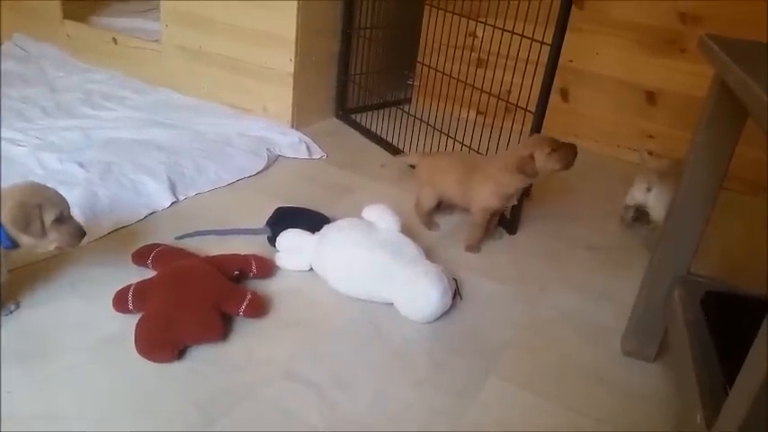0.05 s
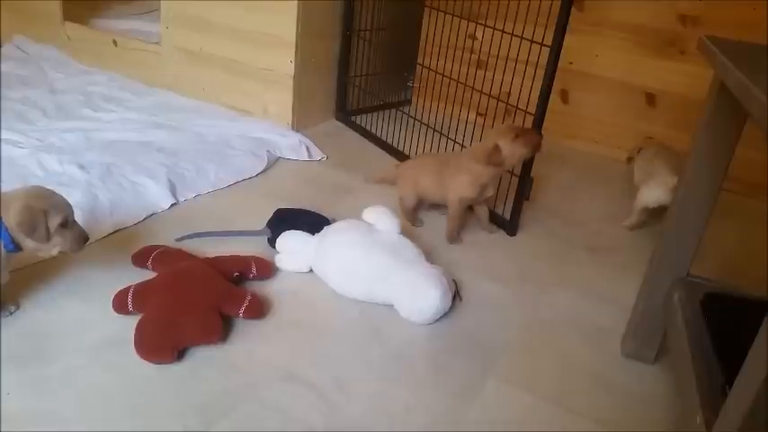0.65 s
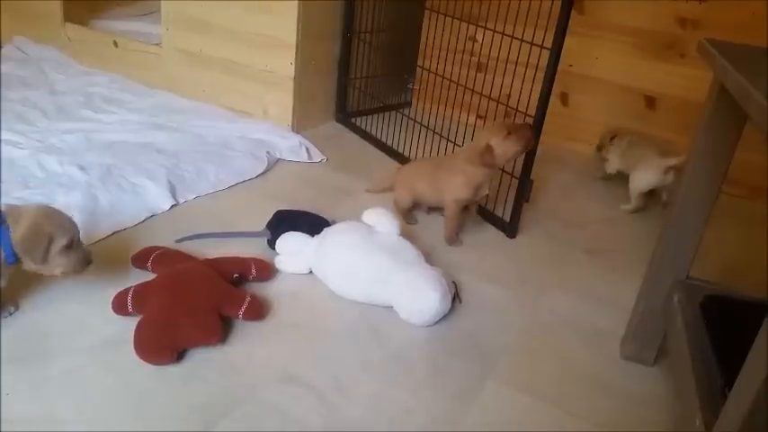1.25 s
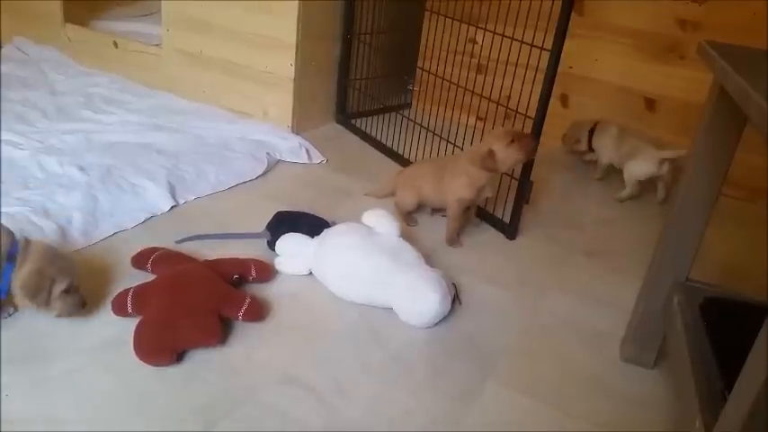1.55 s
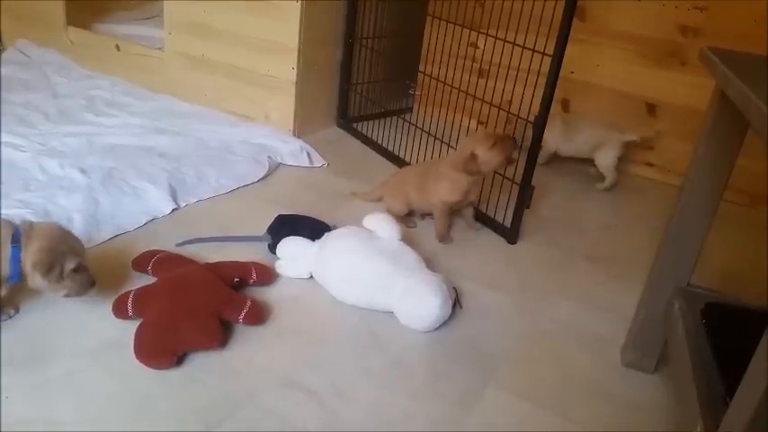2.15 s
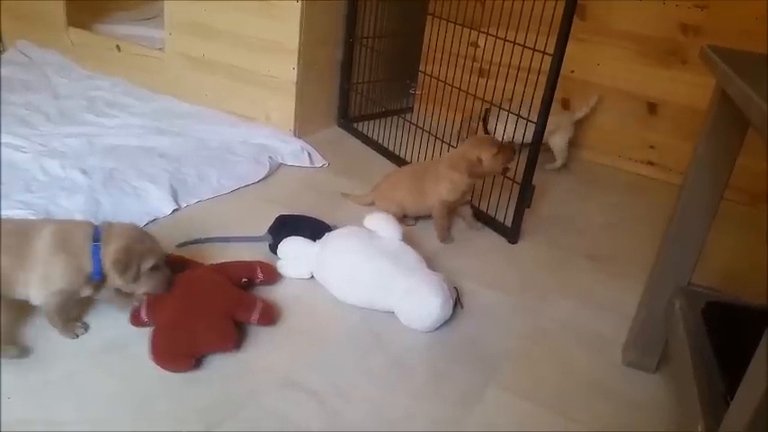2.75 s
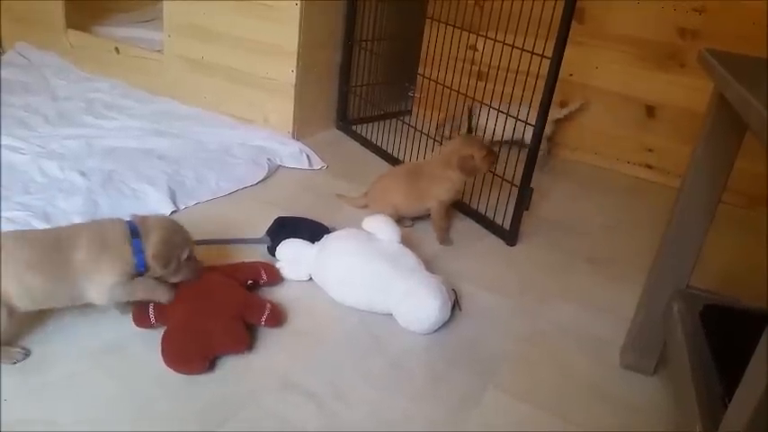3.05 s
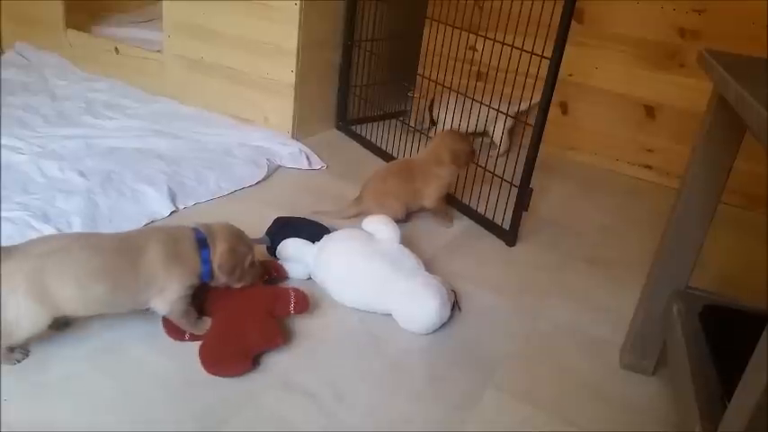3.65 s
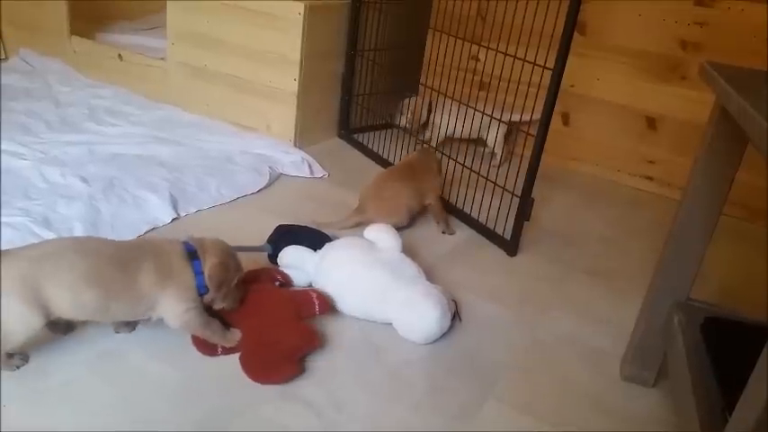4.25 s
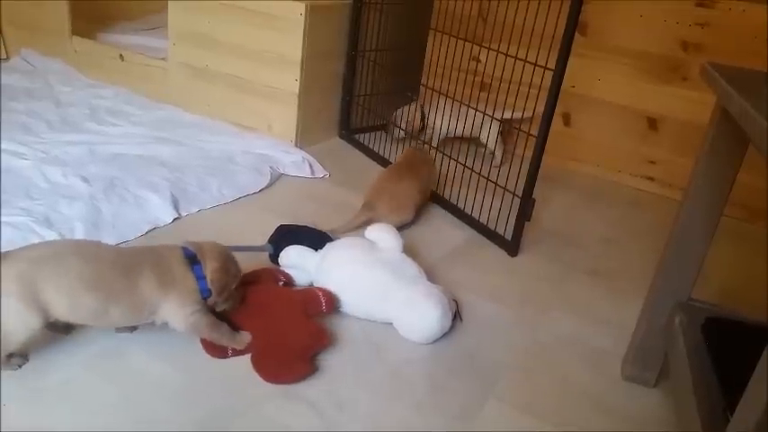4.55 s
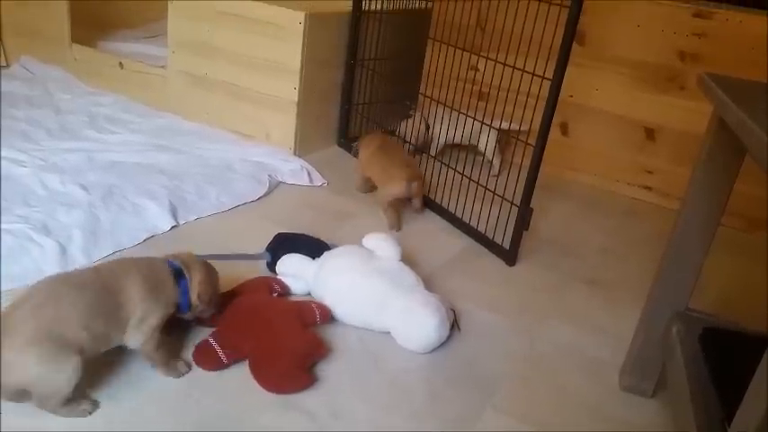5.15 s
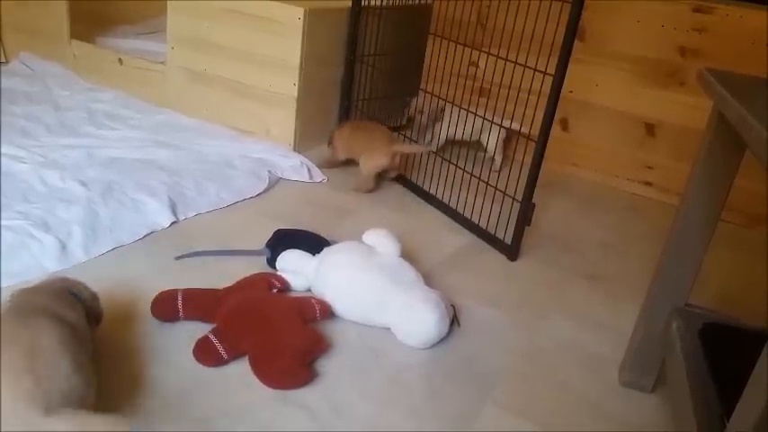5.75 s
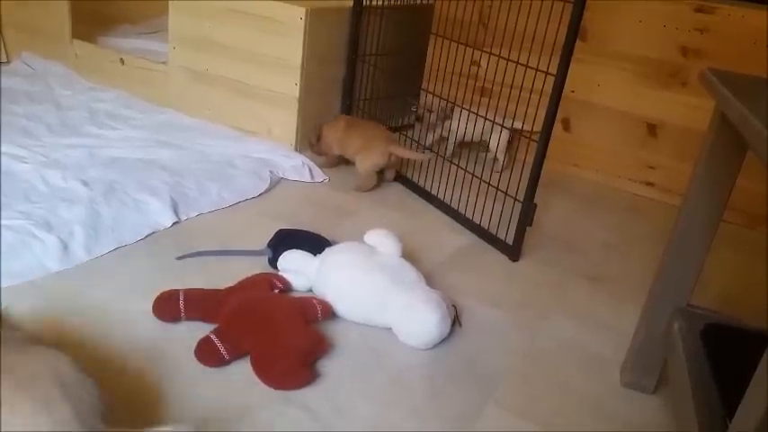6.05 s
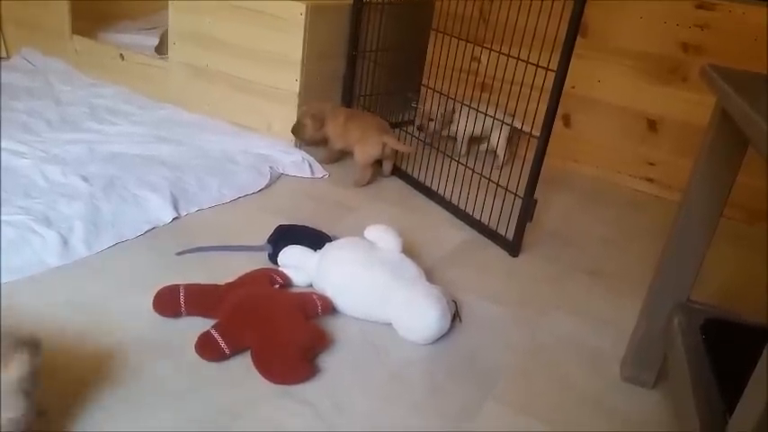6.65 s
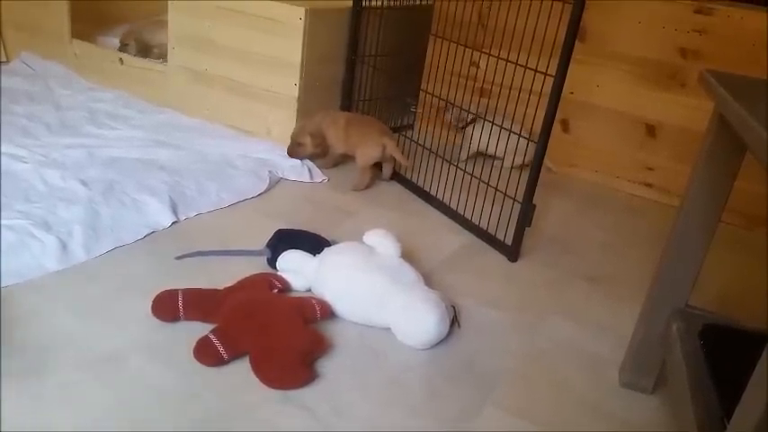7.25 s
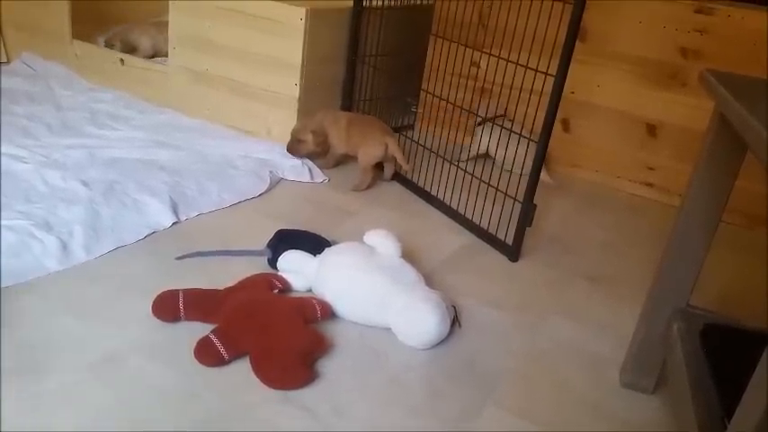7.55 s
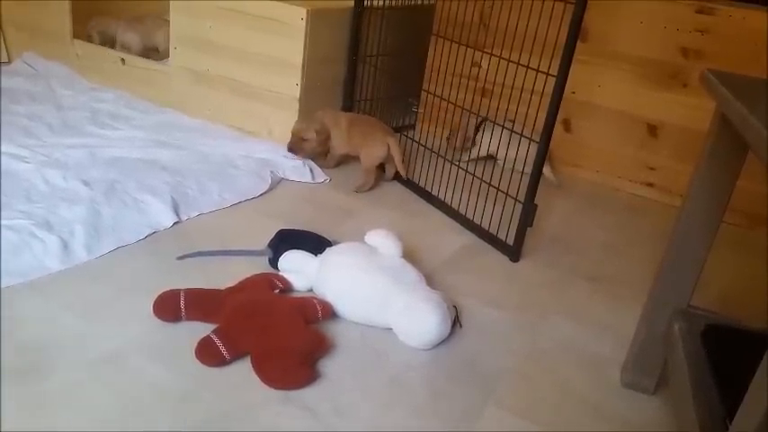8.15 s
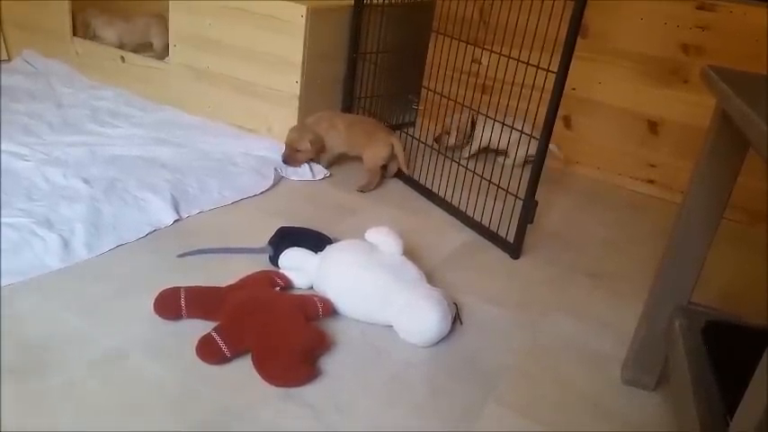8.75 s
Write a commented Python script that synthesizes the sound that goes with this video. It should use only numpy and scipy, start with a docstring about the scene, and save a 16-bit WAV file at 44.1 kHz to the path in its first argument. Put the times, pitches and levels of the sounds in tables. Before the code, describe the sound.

Young puppies whine and cry in short, high, falling calls in a small room, with soft paw steps and scuffs.

```python
"""Puppies whimpering at a wire gate, a little right of a stereo microphone in a small wood-panelled room.
Their vocal folds make every call: one whines in high, almost pure arches that drop away at the end;
a second cries with a brighter voice, hoarse when the folds beat unevenly; softer whimpers and grunts
fall in between. The microphone stands far enough off for the room to smear every glide.
Paws pad and scuff on the floor over a faint hum and hiss."""
import sys
import numpy as np
from scipy import signal
from scipy.fft import rfft, irfft
from scipy.io import wavfile
from scipy.ndimage import uniform_filter1d, minimum_filter1d

SR = 44100
rng = np.random.default_rng(int(sys.argv[2]) if len(sys.argv) > 2 else 0)


def persist_wave(psi):
    """Save psi, clipped to +-1, as 16-bit WAV."""
    counts = np.round(np.clip(psi, -1, 1) * 32767).astype(np.int16)
    wavfile.write(sys.argv[1], SR, np.atleast_2d(counts).T)


N = 397341
TIME = np.arange(N) / SR

# Levels in the tables are relative: each source adds its own gain.
# Spectra of room air, high hiss and rubbing paws. Each row: frequency in Hz, level in dB.
AIR_COLOUR = [(15, -29), (25, 2.5), (43, -5.5), (219, 0), (610, -17), (1150, -11), (2070, -13.5),
              (3280, -27.5), (6500, -36), (8500, -65), (11000, -94), (18700, -120)]
HISS_COLOUR = [(8300, -31), (9400, -8.5), (10200, 3), (12000, 4.5), (13500, 1.5), (15000, 1)]
SCUFF_COLOUR = [(300, -14.5), (800, 7), (1500, 5), (2200, 11.5), (3300, -8.5), (5000, -6.5), (6500, -17),
                (8000, -28), (11000, -11), (15000, -14)]
# Spectrum of bodies moving about. Each row: frequency in Hz, level in dB.
SHUFFLE_COLOUR = [(60, -24.5), (130, -7.5), (220, -1.5), (330, -10), (550, -9.5), (1500, -9),
                  (3000, -23), (8000, -44.5)]
# Slow swells of the hum and the hiss. Each row: time in seconds, level in dB.
HUM_LEVELS = [(0, -61), (1.5, -60.5), (5.3, -54.5), (5.9, -64), (9, -65.5)]
HISS_LEVELS = [(0.0, -56), (2.91, -59.5), (3.71, -56), (4.84, -56), (6.1, -65.5), (6.57, -59.5),
               (6.97, -66), (7.5, -56), (8.73, -65), (9.01, -55)]
# The first puppy's whines. Each row: start, length and rise in seconds; onset, crest, shoulder and
# end pitch in Hz; level, onset and end offsets, second harmonic and higher harmonics in dB.
WHINES = [ (0.067, 0.13, 0.052, 1399, 1562, 1520, 832, -17, -7, 1, -30.5, -38.5),
          (0.340, 0.22, 0.047, 1297, 1548, 1372, 831, -16.5, 1, 2, -34.5, -41),
          (0.678, .240, 0.066, 1210, 1452, 1369, 851, -15, -7, 0.5, -33.5, -39.5),
          (1.060, .467, 0.066, 1131, 1438, 1388, 834, -14.5, 1, -1.5, -32, -39),
          (1.673, 0.44, 0.11, 1161, 1430, 1426, 792, -16, 1.5, -0.5, -27.5, -34),
          (3.589, 0.12, 0.049, 1674, 1835, 1680, 1203, -14, -11.5, -14, -20, -34.5),
          (3.856, 0.22, 0.054, 1393, 1755, 1621, 1312, -18, -2.5, -5, -26.5, -34),
          (4.218, 0.086, 0.057, 1395, 1640, 1630, 1593, -15.5, -3.5, -18.5, -38.5, -34.5),
          (4.314, 0.075, 0.031, 1561, 1578, 1589, 1586, -27, -5.5, 3.5, -23, -24),
          (4.387, 0.16, 0.043, 1583, 1614, 1616, 1619, -15.5, -5.5, -9.5, -27.5, -34.5),
          (7.097, 0.046, 0.014, 1553, 1530, 1472, 1420, -30, -4, -16.5, -30, -35.5),
          (7.468, 0.1, 0.0257, 1713, 1822, 1752, 1228, -14, 1, -7, -30, -42),
          (7.759, 0.19, 0.14, 1606, 1894, 1862, 1385, -12, -11.5, -7, -22.5, -39),
          (8.143, 0.12, 0.058, 1684, 1871, 1813, 1174, -19, -7, -5, -20, -35),
          (8.878, 0.12, 0.075, 1545, 1668, 1638, 1016, -14.5, -13.5, -8.5, -35.5, -38), ]
# Soft whimpers and grunts. Each row: start and length in seconds, start and end pitch in Hz,
# level and second harmonic in dB, roughness from 0 to 1.
WHIMPERS = [ (0.110, 0.068, 903, 785, -31.5, -24, 0.2), (0.315, 0.065, 929, 755, -34.5, -16.5, 0),
            (1.781, 0.081, 1134, 839, -39.5, -1.5, 0.03), (2.014, 0.047, 1050, 736, -37, -11, 0.08),
            (2.168, 0.11, 1032, 923, -36, -11.5, .15), (2.468, 0.033, 377, 350, -49, -7, 0.08),
            (2.645, 0.019, 691, 769, -37.5, -24, 0.03), (2.839, 0.031, 596, 520, -40, -14, 0.5),
            (3.043, 0.067, 1321, 1278, -32.5, -37, 0.05), (3.232, 0.14, 637, 515.5, -36.5, -8.5, 0.33),
            (3.560, 0.064, 579.6, 588.5, -35.5, -12, 0.61), (3.732, 0.095, 987, 968, -42.5, -30, 0.04),
            (3.829, 0.071, 295.3, 340.4, -35.5, -10.5, 0), (4.216, 0.035, 690, 567, -41.5, -16, 0.2),
            (4.504, .05, 728, 560, -36.5, -6.5, 0.54), (4.797, 0.16, 306.4, 160.4, -44.5, -12.5, 0.16),
            (5.076, 0.042, 286, 275, -45.5, -18, 0), (5.092, 0.055, 962, 889, -38, -22.5, 0.09),
            (5.315, 0.064, 443.3, 428.3, -45, -0.5, 0.05), (5.522, 0.03, 708, 744, -41.5, -20, 0.04),
            (6.577, 0.046, 1013, 646, -48.5, -16.5, 0.44), (7.438, .045, 1893, 1703, -36, -26.5, 0.08),
            (8.25, 0.024, 703, 534, -41, -4, 0.08), (8.489, 0.022, 687, 530, -42, -3, 0),
            (8.738, 0.051, 874, 775, -36, -19.5, 0), (8.851, 0.064, 970, 871, -45, -15, 0), ]
# The second puppy's long, two-crested cry. Each row: time in seconds, pitch in Hz.
LONG_CRY_PITCH = [(2.272, 1102), (2.344, 1287), (2.422, 1221), (2.582, 1405), (2.688, 1390), (2.77, 1278),
                  (2.808, 1107), (2.82, 1100), (2.854, 949), (2.865, 930)]
# Short cries, and two soft falling whimpers with weak overtones.
# Each row: the columns of WHINES, then roughness from 0 to 1.
SHORT_CALLS = [ (3.026, .095, 0.035, 1130, 1155, 1155, 1148, -25, 1.5, -5.5, -6, -18, 0.07),
               (3.125, .110, .02, 1140, 1099, 1030, 885, -35, -1.5, -0.5, -6, -19, 0.2),
               (3.240, .095, 0.021, 907, 914, 894, 864, -35.5, -3, 1, -5.5, -25.5, 0.33),
               (3.339, .100, 0.021, 765, 746.4, 686, 606, -34, 2.5, -4.5, -4, -18.5, 0.56),
               (4.138, 0.078, .02, 1236, 1222, 1176, 673, -34.5, 1, -2, -27, -32.5, 0.1),
               (4.420, .090, .02, 1264, 1242, 1199, 700, -36.5, -5, 1, -26, -35.5, .05),
               (4.689, 0.064, 0.031, 1065, 1147, 1116, 694, -34.5, 0, 5.5, -9.5, -25, 0),
               (4.768, 0.052, 0.033, 835, 898, 930.3, 900, -32.5, 7.5, -5.5, 1, -29, 0.65),
               (4.842, 0.1, 0.0555, 980, 1138, 1133, 1070, -28.5, -1.5, -12, -30, -25.5, 0.11),
               (8.476, 0.04, 0.024, 1254, 1413, 1400, 1105, -23, 3, 0.5, -41, -54, .02),
               (8.515, .085, 0.024, 1149, 1121, 1096, 925, -38.5, 13, -4, -14, -35, .06), ]
# Throats colour the higher harmonics, the mouth the second. Each row: frequency in Hz, gain in dB.
WHINE_THROAT = [(3000, -4.5), (4200, 5), (5300, 5.5), (7100, -5), (7900, -18), (9200, -6.5), (11500, -8),
                (15000, -13)]
WHIMPER_THROAT = [(1300, -3.5), (2200, -18.5), (3200, -38.5), (12000, -52.5)]
CRY_THROAT = [(2400, 6), (3050, -6), (3450, 2), (3850, 2.5), (5000, -6), (6200, -12.5), (7200, -28),
              (8200, -38), (10000, -27.5), (14000, -51)]
MOUTH = [(1600, 14), (2000, 15), (2450, 9), (2850, -1.5), (3250, -5), (3600, 8), (3850, 7.5)]
# The main paw falls. Each row: time in seconds, level in dB.
PAW_FALLS = [(0.951, -24.5), (1.563, -13), (1.58, -14), (2.175, -23), (2.277, -22.5), (3.311, -25.5),
             (4.171, -22), (4.345, -27.5), (4.517, -20), (4.57, -21.5), (5.08, -35), (5.714, -35),
             (5.924, -43), (6.031, -42.5), (6.252, -33.5), (7.516, -26.5), (7.773, -26.5)]
# Resonances of the floor. Each row: frequency in Hz, level in dB, time to fall 60 dB in seconds.
FLOOR_MODES = [(152, -4.5, 0.052), (199.3, -6.5, 0.17), (214.7, -1.5, 0.16), (286, 0.5, 0.065),
               (361, -4, .06), (478, -12, 0.016)]
# Rubs on floor and blanket. Each row: start and length in seconds, level in dB, tilt in dB per octave.
SCUFFS = [(1.548, 0.074, -35, -2), (5.163, 0.038, -52.5, 0), (5.513, 0.04, -47, 5), (5.82, 0.091, -53.5, 6),
          (6.133, 0.16, -57.5, 6), (6.478, 0.13, -50, 3), (7.055, .05, -56, 5.5), (7.309, 0.11, -48.5, 1),
          (8.581, 0.061, -43, -2.5), (8.83, 0.061, -50.5, 4)]
# First reflections off floor and walls. Each row: delay in ms, left and right level in dB.
REFLECTIONS = [(3.1, -17.5, -12.5), (7.4, -14.5, -9.5), (12.6, -14.5, -7.5), (19.3, -16.5, -10)]
# The room's decay. Each row: frequency in Hz, time to fall 60 dB in seconds.
ROOM_T60 = [(150, 0.27), (500, 0.23), (1300, 0.36), (3500, 0.31), (7000, 0.43), (14000, 0.21)]
# Diffuse sound at the microphone. Each row: frequency in Hz, left-right correlation.
STEREO_CORRELATION = [(60, 0.99), (300, 0.85), (700, 0.61), (1400, 0), (3000, 0)]

CUTOFF_HZ = 15800
SWELL_S = 0.035   # length of a call's soft edge


def from_db(db):
    """Decibels to gain."""
    return 10 ** (np.asarray(db) / 20)


def unit_rms(x):
    """Scale to unit power."""
    return x / np.sqrt(np.mean(x ** 2) + 1e-20)


def at_hz(points, hz):
    """Read a spectrum on a log-frequency axis."""
    freqs, values = np.transpose(points)
    return np.interp(np.log(np.maximum(hz, 1)), np.log(freqs), values)


def panned(left_db):
    """Channel gains that put the left side left_db above the right."""
    return unit_rms(from_db(np.array([[left_db], [-left_db]]) / 2))


def wobble(size, rate_hz):
    """A smooth random drift with a spread of about 1."""
    pole, run_in = np.exp(-2 * np.pi * rate_hz / SR), SR // 4
    drift = signal.lfilter([1], [1, -2 * pole, pole * pole], rng.standard_normal(size + run_in))
    return unit_rms(drift[run_in // 2:])[-size:]


def noise(colour, size, db_per_octave=0):
    """Unit-power noise of a given spectrum, tilted above 700 Hz."""
    hz = np.fft.rfftfreq(size, 1 / SR)
    shape = from_db(at_hz(colour, hz) + db_per_octave * np.log2(np.maximum(hz, 700)))
    return unit_rms(irfft(rfft(rng.standard_normal(size)) * shape, size))


def diffuse(pair):
    """Two unrelated noises become a stereo field, alike in the bass and apart in the treble."""
    size = pair.shape[1]
    alike = at_hz(STEREO_CORRELATION, np.fft.rfftfreq(size, 1 / SR))
    mid, side = rfft(pair)
    return irfft(np.sqrt((1 + alike) / 2) * mid + np.sqrt((1 - alike) / 2) * side * [[1], [-1]], size)


def fade(t, start, end, attack_s, release_s):
    """An on-off envelope with smooth edges."""
    rise = np.sin(np.pi / 2 * np.clip((t - start) / attack_s, 0, 1)) ** 2
    fall = np.sin(np.pi / 2 * np.clip((end - t) / release_s, 0, 1)) ** 2
    return rise * fall


def during(start, length):
    """The sample times of one call."""
    return TIME[int(start * SR):int((start + length) * SR)]


def room_tone(air_db=-57.5, hum_hz=83):
    """Still air all round the microphone, a wavering low hum and a thin hiss towards the left."""
    air = from_db(air_db) * diffuse(np.array([noise(AIR_COLOUR, N), noise(AIR_COLOUR, N)]))
    hum = np.sqrt(2) * np.sin(2 * np.pi * hum_hz * TIME + 0.48 * wobble(N, 1.3))
    hum *= from_db(np.interp(TIME, *np.transpose(HUM_LEVELS)) - 2 + 3.8 * wobble(N, 3.2))
    hiss = np.array([noise(HISS_COLOUR, N), noise(HISS_COLOUR, N)])
    hiss *= from_db(np.interp(TIME, *np.transpose(HISS_LEVELS)) + 5 + 1.1 * wobble(N, 10))
    return air + hum + hiss * panned(4)


def shuffle(level_db=-55, uneven_db=7.5, lull_db=-9):
    """Small bodies moving about keep up a dull, uneven patter, with a lull while they stand still."""
    lull = fade(TIME, 5.4, 7.57, 0.34, 0.26)
    return from_db(level_db + lull_db * lull + uneven_db * wobble(N, 6.4)) * noise(SHUFFLE_COLOUR, N)


def nose_whistle(top_hz=9350, sag=0.12, lead_s=0.027, length_s=0.15, level_db=-61):
    """A faint, very high whistle leads into each whine, varying in strength and pitch."""
    out, size = np.zeros(N), int(length_s * SR)
    from_crest = np.linspace(-.5, 1.3, size)   # a short rise and a longer fall
    for (start, *_), (louder, higher) in zip(WHINES, rng.standard_normal((len(WHINES), 2))):
        at = int((start - lead_s) * SR)
        pitch = top_hz * (1 + .025 * higher - sag * from_crest ** 2 + sag / 10 * wobble(size, 5.4))
        swell = from_db(level_db + 4 * louder) * np.sqrt(np.hanning(size))
        out[at:at + size] += (swell * np.sin(2 * np.pi * np.cumsum(pitch) / SR))[:N - at]
    return out


def arched_call(start, length, rise_s, onset_hz, crest_hz, shoulder_hz, end_hz,
                db, onset_db, end_db, second_db, higher_db, rough=0):
    """Contours of a call that scoops to its crest, glides to a shoulder and collapses."""
    drop_s = .062   # the pitch falls ever faster over this last stretch
    t = during(start, length)
    age = t - start
    scoop = np.clip(1 - age / rise_s, 0, 1) ** 2
    drop = np.clip(1 - (length - age) / min(drop_s, length / 2), 0, 1) ** 2.4
    shoulder_s = max(length - drop_s, rise_s + drop_s / 2)
    glide = np.interp(age, [rise_s, shoulder_s], [crest_hz, shoulder_hz])
    pitch = glide * (1 + scoop * (onset_hz / crest_hz - 1)) * (1 + drop * (end_hz / shoulder_hz - 1))
    mouth_db = at_hz(MOUTH, 2 * pitch) - at_hz(MOUTH, 2 * crest_hz)
    level_db = db + onset_db * np.clip(1 - age / SWELL_S, 0, 1) + end_db * np.sqrt(drop)
    return t, pitch, level_db, second_db + mouth_db, higher_db, rough


def vocal_folds(pitch, level_db, second_db, higher_db, hoarse, throat, quaver):
    """Folds beat on a quavering pitch, unevenly when hoarse. Returns fundamental and breathy overtones."""
    size = len(pitch)
    pitch = uniform_filter1d(pitch, SR // 80, mode="nearest")   # the larynx rounds each turn
    fall_octaves_per_s = -np.gradient(np.log2(pitch)) * SR
    rough = np.maximum(hoarse, 0.1 * np.clip(fall_octaves_per_s / 20, 0, 1))   # slackening folds rasp
    jitter = quaver * wobble(size, 51) + 0.1 * rough * wobble(size, 230)
    phase = 2 * np.pi * np.cumsum(pitch * (1 + jitter)) / SR
    harmonics = np.arange(3, 13)[:, None]
    gains = from_db(at_hz(throat, harmonics * pitch)) * (harmonics * pitch < CUTOFF_HZ)
    higher = np.sum(gains * np.sin(harmonics * phase), axis=0) / np.sqrt(np.sum(gains ** 2, axis=0))
    level = np.sqrt(2) * from_db(level_db) * (1 + rough * wobble(size, 170))
    breath = from_db(-48 + 19 * rough) * noise([(500, -22), (1500, -3)] + throat, size, -6)
    flutter = from_db(2.5 * wobble(size, 30))   # the folds close unevenly
    overtones = flutter * (from_db(second_db) * np.sin(2 * phase) + from_db(higher_db) * higher)
    return level * np.array([np.sin(phase), overtones + breath])


def puppy(calls, throat, left_db, overtone_left_db, overtone_db=0, quaver=.0035):
    """Calls that share a throat colour; overtones are beamed further to one side than the fundamental."""
    out = np.zeros((2, N))
    for t, pitch, level_db, second_db, higher_db, rough in calls:
        at, size = round(t[0] * SR), len(t)
        pitch = pitch * (1 + .007 * wobble(size, 9))
        higher_db = higher_db + 3 * wobble(size, 5.1)
        level_db = level_db + 2 * wobble(size, 18)   # the effort trembles
        voice = vocal_folds(pitch, level_db, second_db, higher_db, rough, throat, quaver)
        out[:, at:at + size] += voice * fade(t, t[0], t[-1], attack_s=0.0066, release_s=0.0027)
    fundamental, overtones = out
    return fundamental * panned(left_db) + from_db(overtone_db) * overtones * panned(overtone_left_db)


def whimper(start, length, start_hz, end_hz, db, second_db, rough, bow=.04):
    """Contours of a short, bowed glide that swells and fades; its higher harmonics follow the throat."""
    t = during(start, length)
    along = (t - start) / length
    pitch = start_hz * (end_hz / start_hz) ** along * (1 + bow * np.sin(np.pi * along))
    level_db = db + np.interp(along, [0, .4, 1], [-1.5, 0, -4])
    higher_db = second_db - 3 + at_hz(WHIMPER_THROAT, 3 * pitch)
    return t, pitch, level_db, second_db, higher_db, rough


def paws(gain_db=-7.5, contact_s=0.0012, light_count=45):
    """Each pad lands as a soft push that sets the floor ringing; light steps fall at random."""
    light_steps = np.c_[rng.uniform(0, TIME[-1], light_count), rng.normal(-42, 4, light_count)]
    times, step_db = np.vstack([PAW_FALLS, light_steps]).T
    floor = np.zeros(N)
    for k, (hz, mode_db, t60) in enumerate(FLOOR_MODES):
        pushes = np.zeros(N)
        push_db = step_db + mode_db + gain_db + 2 * rng.standard_normal(len(times))
        pushes[(times * SR).astype(int)] = from_db(push_db)
        pole, angle = from_db(-60 / (t60 * SR)), 2 * np.pi * hz / SR
        feedback = [1, -2 * pole * np.cos(angle), pole * pole]
        floor += (-1) ** k * signal.lfilter([0, np.sin(angle)], feedback, pushes + 1e-18)
    pad = np.hanning(int(contact_s * SR) + 3)
    thuds = signal.lfilter(pad / pad.sum(), [1], floor)
    low_cut = signal.butter(2, 130, "high", fs=SR, output="sos")   # light paws radiate no deep bass
    return signal.sosfilt(low_cut, thuds)


def scuffs(gain_db=-1, grain_db=6):
    """Paws rub on floor and blanket in short swells of grainy friction noise."""
    out = np.zeros(N)
    for start, length, db, tilt in SCUFFS:
        at, size = int(start * SR), int(length * SR)
        stroke = np.sqrt(np.hanning(size)) * from_db(db + gain_db + grain_db * wobble(size, 90))
        out[at:at + size] += (stroke * noise(SCUFF_COLOUR, size, tilt))[:N - at]
    return out


def long_cry(strain_at_s=2.424, strain_width_s=0.082, break_at_s=2.765, break_s=0.064):
    """Contours of a loud cry that tires, strains shrill between its crests and breaks into a rasp."""
    times, hz = np.transpose(LONG_CRY_PITCH)
    t = during(times[0], times[-1] - times[0])
    strain = np.exp(-((t - strain_at_s) / strain_width_s) ** 2 / 2)
    broken = np.clip((t - break_at_s) / break_s, 0, 1)
    edges_db = np.interp(t, [t[0], t[0] + SWELL_S, t[-1] - SWELL_S, t[-1]], [-11, 0, 0, 3.5])
    tiring_db = -18.5 * (t - t[0])
    # In the strain and the break, the fundamental gives way to the overtones.
    level_db = -10.5 + edges_db + tiring_db - 4 * strain - 9.5 * broken ** 2
    second_db = -23.5 + 9.25 * strain + 34.5 * broken
    higher_db = -32 + 18.5 * strain + 19 * broken
    rough = 0.66 * np.clip(2 * broken - 1, 0, 1) ** 2
    return t, np.interp(t, times, hz), level_db, second_db, higher_db, rough


def room(x, direct_db=-4, tail_db=-1.5, build_s=0.0061):
    """The microphone hears the direct sound, a few reflections, then a tail that dies band by band."""
    t = TIME[:SR * 3 // 5]
    field = rfft(diffuse(rng.standard_normal((2, len(t)))))
    hz, centres = np.fft.rfftfreq(len(t), 1 / SR), np.array(ROOM_T60)[:, 0]
    response = np.zeros((2, len(t)))
    for weights, (_, t60) in zip(np.eye(len(centres)), ROOM_T60):
        band = irfft(field * at_hz(np.c_[centres, weights], hz), len(t))
        response += band * from_db(-60 * t / t60)
    response *= 1 - np.exp(-t / build_s)
    voice_band = (hz > 800) & (hz < 2000)
    response *= from_db(tail_db) / np.sqrt(np.mean(abs(rfft(response)[:, voice_band]) ** 2))
    response[:, 0] += from_db(direct_db)
    for ms, *sides_db in REFLECTIONS:
        response[:, int(ms * SR / 1000)] += from_db(np.array(sides_db) + direct_db)
    return signal.fftconvolve(x, response, axes=1)[:, :N]


def limiter(x, ceiling_db=-1.2, release_db_per_s=150):
    """The gain ducks just ahead of any peak over the ceiling and recovers quickly."""
    window = SR // 200
    over_db = np.maximum(20 * np.log10(abs(x).max(axis=0) + 1e-9) - ceiling_db, 0)
    held_db = np.maximum.accumulate(over_db + release_db_per_s * TIME) - release_db_per_s * TIME
    return x * from_db(uniform_filter1d(minimum_filter1d(-held_db, window), window))


def scene():
    """From the microphone: three voices right of centre, footfalls ahead, scuffs well to the right."""
    whines = puppy([arched_call(*row) for row in WHINES], WHINE_THROAT,
                   left_db=-3, overtone_left_db=-11.5, overtone_db=-1.5)
    cry_and_calls = puppy([long_cry()] + [arched_call(*row) for row in SHORT_CALLS], CRY_THROAT,
                          left_db=-3, overtone_left_db=-9.5)
    whimpers = puppy([whimper(*row) for row in WHIMPERS], WHIMPER_THROAT,
                     left_db=-1.5, overtone_left_db=-5.5, overtone_db=3.5, quaver=.01)
    voices = from_db(1.5) * whines + from_db(4.5) * cry_and_calls + from_db(8) * whimpers
    voices[0] = np.roll(voices[0], 3)   # the sound reaches the microphone's left side a little later
    return room(voices + nose_whistle() + paws() + shuffle() + scuffs() * panned(-11)) + room_tone()


def record(dry):
    """The microphone sheds the deepest bass, peaks are held down and the top is cut steeply."""
    low_cut = signal.butter(2, 45, "high", fs=SR, output="sos")
    high_cut = signal.ellip(10, .1, 70, CUTOFF_HZ, fs=SR, output="sos")
    return signal.sosfiltfilt(high_cut, limiter(signal.sosfilt(low_cut, dry)))


dry = scene()
out = record(dry)
persist_wave(out)
```